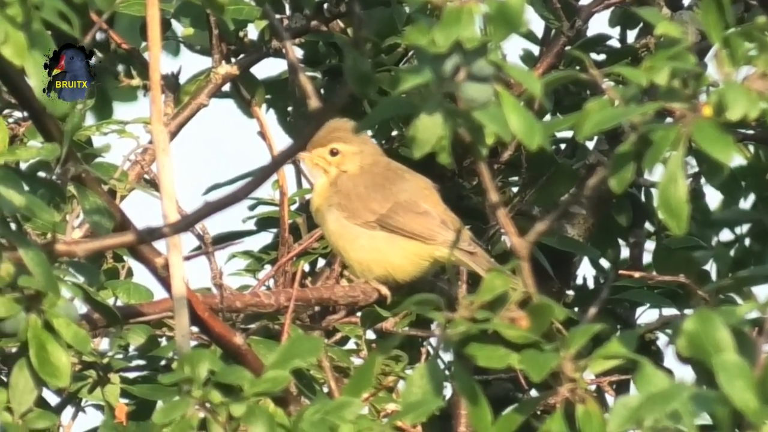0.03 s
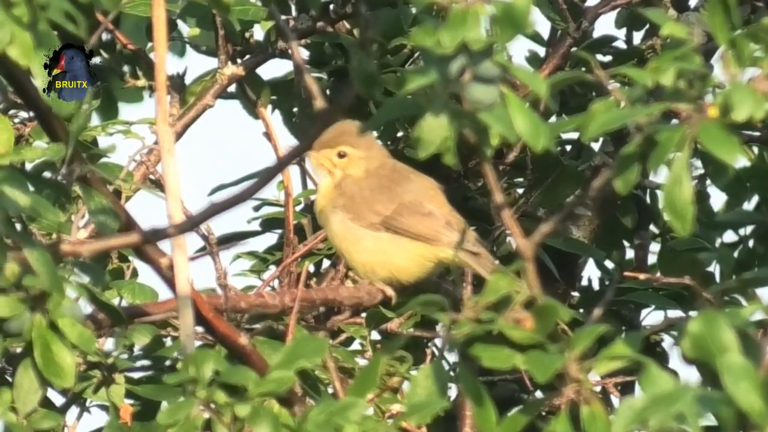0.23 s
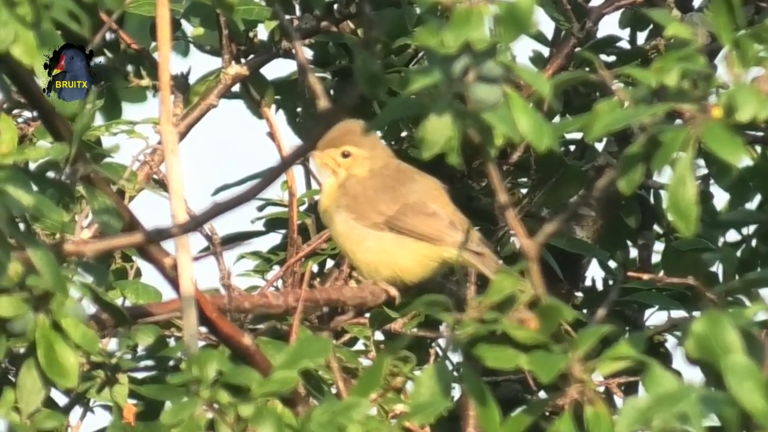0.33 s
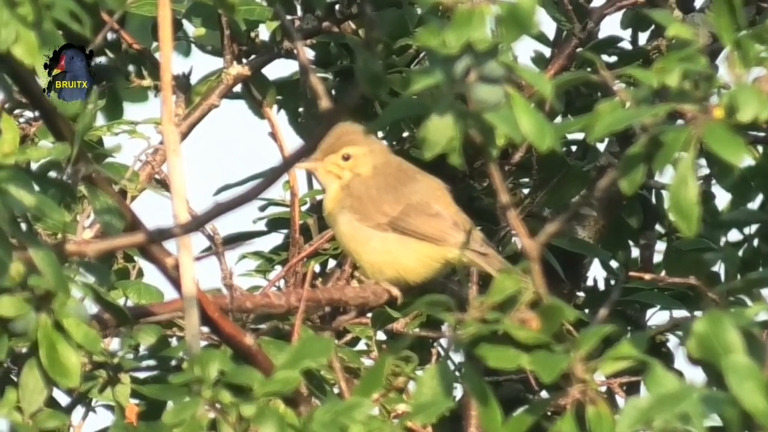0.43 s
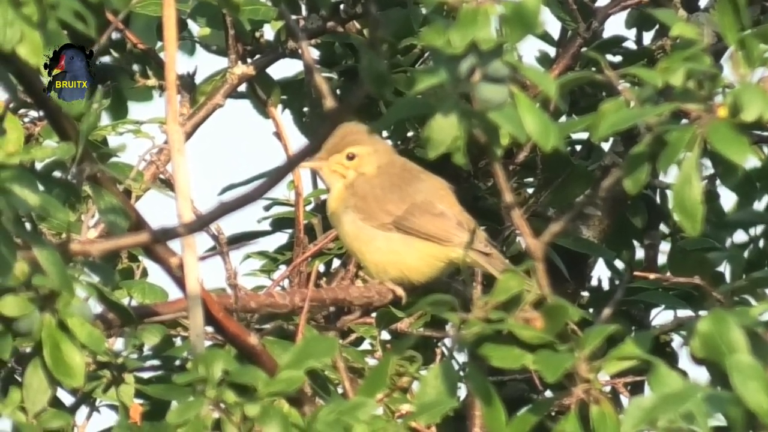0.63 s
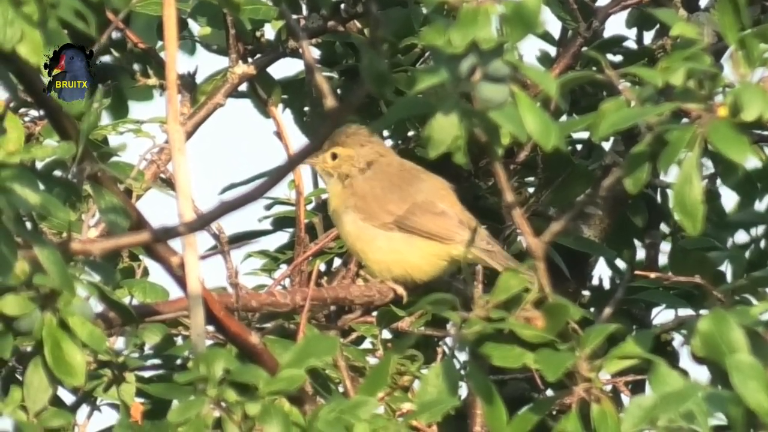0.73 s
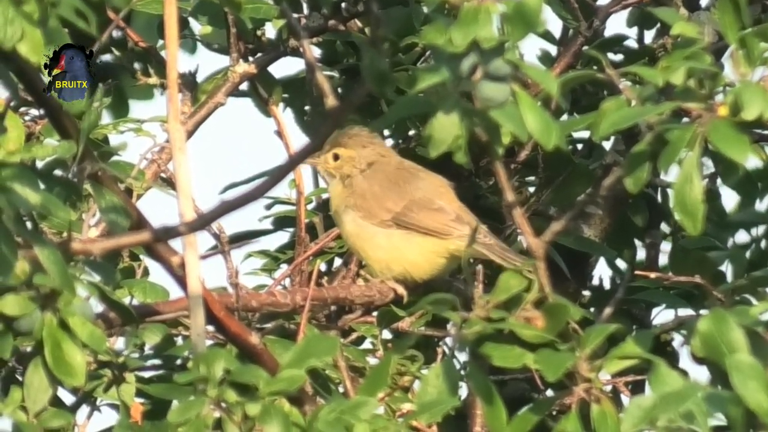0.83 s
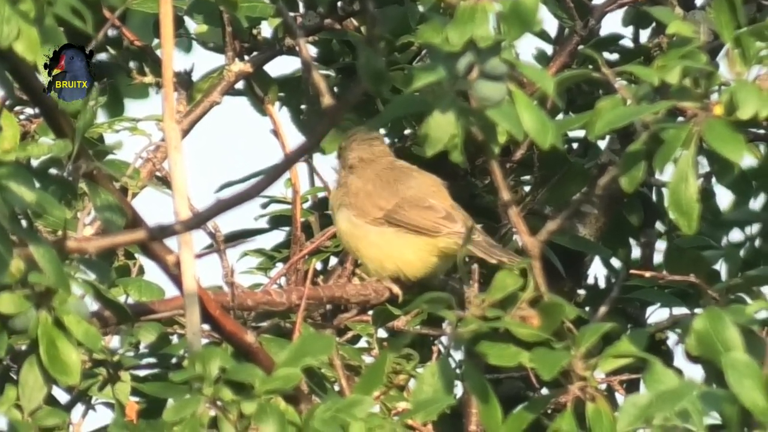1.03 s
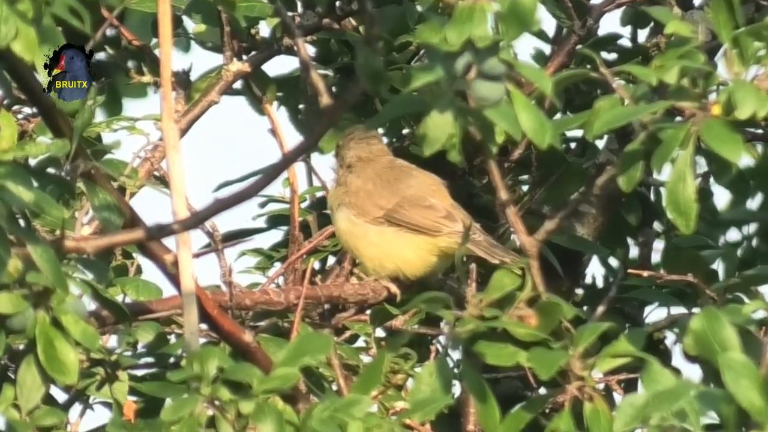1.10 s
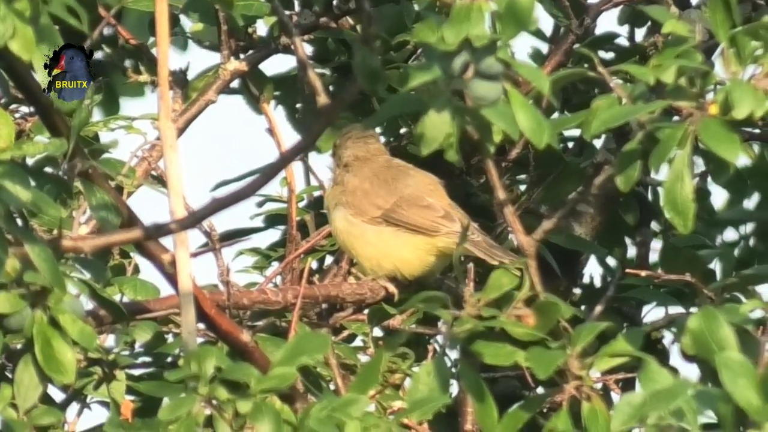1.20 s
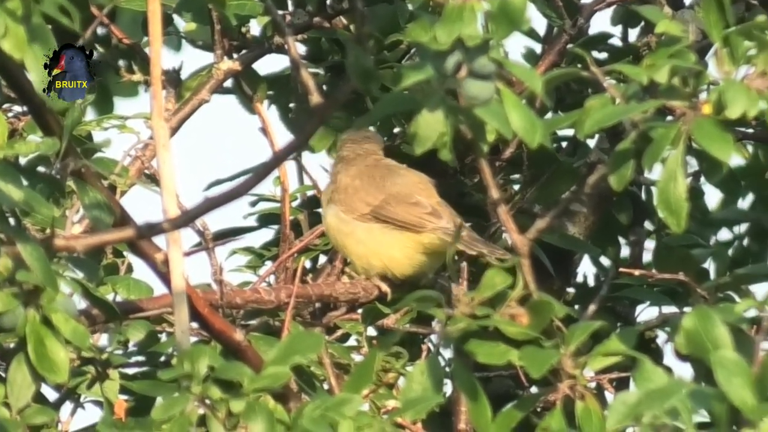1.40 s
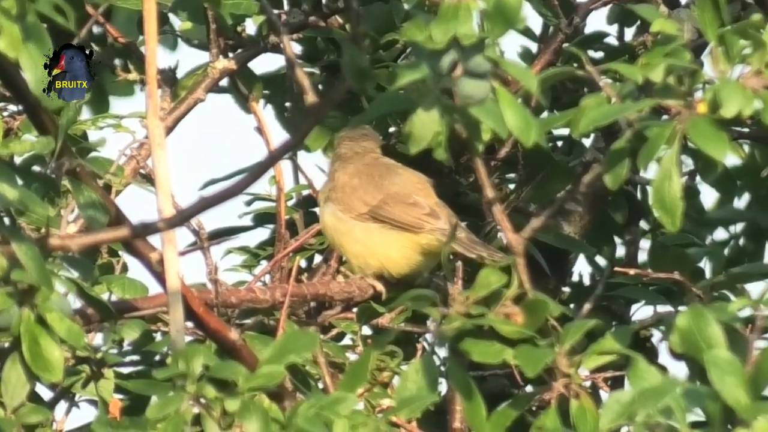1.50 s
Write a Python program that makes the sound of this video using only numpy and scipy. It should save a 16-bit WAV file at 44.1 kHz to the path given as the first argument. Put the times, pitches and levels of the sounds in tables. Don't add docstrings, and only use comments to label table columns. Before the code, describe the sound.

A small warbler gives a dry, buzzy chattering rattle from a bush, faint birds whistling behind

```python
import sys
import numpy as np
from scipy import signal
from scipy.fft import rfft, irfft
from scipy.io import wavfile

SR = 44100
rng = np.random.default_rng(int(sys.argv[2]) if len(sys.argv) > 2 else 0)


def nominal_scale(level):
    x = np.asarray(level, float) / 20
    return 10 ** x


def log_audio(samples):
    frames = np.atleast_2d(samples).T
    limited = np.clip(frames, -1, 1)
    pcm = np.round(limited * 32767).astype(np.int16)
    wavfile.write(sys.argv[1], SR, pcm)


N = 68355

# frequency in Hz, density in dB per Hz.
AIR_SPECTRUM = [(150, -14), (250, -15.5), (945, -4.5), (1290, -5), (1610, -8), (2090, -13.5), (2710, -8),
                (3060, -10.5), (15500, -25.5)]


def rms_one(x):
    return x / np.sqrt(np.mean(x ** 2) + 1e-20)


def drift(rate_hz):
    settle = 20000
    r = np.exp(-2 * np.pi * rate_hz / SR)
    slow = signal.lfilter([1], [1, -2 * r, r * r], rng.standard_normal(N + settle))
    return rms_one(slow[settle:])


def coloured(points):
    hz, level = np.transpose(points)
    f = np.maximum(np.arange(N // 2 + 1) * SR / N, 1)
    shape = np.interp(np.log(f), np.log(hz), level, left=-80, right=-80)
    return rms_one(irfft(rfft(rng.standard_normal(N)) * nominal_scale(shape), N))


def band(low_hz, high_hz):
    sos = signal.butter(2, [low_hz, high_hz], "band", fs=SR, output="sos")
    return rms_one(signal.sosfilt(sos, rng.standard_normal(N)))


def air():
    return nominal_scale(-45 + 0.76 * drift(9.1)) * coloured(AIR_SPECTRUM)


def drones():
    # centre in Hz, width in Hz, level at first in dB, level at last in dB.
    hums = [
        (428.5, 93, -53.5, -53.5),
        (1658, 160, -64, -48.5),
        (3420, 900, -53.5, -61),
    ]
    total = np.zeros(N)
    for hz, width, first_db, last_db in hums:
        level_db = np.linspace(first_db, last_db, N) + 1.9 * drift(16)
        total += nominal_scale(level_db) * band(hz - width / 2, hz + width / 2)
    return total


def rumble():
    # frequency in Hz, density in dB per Hz.
    rumble_spectrum = [(8.8, -32), (15, 4.5), (25, -1.5), (70, -10.5), (140, -15.5), (300, -12.5),
                       (390, -55), (660, -120)]
    return nominal_scale(-56) * coloured(rumble_spectrum)


def traffic():
    # time in seconds, level in dB.
    approach = [
        (0.0, -51),
        (0.056, -74),
        (0.966, -70.5),
        (1.026, -58.5),
        (1.55, -46.5),
    ]
    edges_hz = [111, 292]
    s, db = np.transpose(approach)
    level_db = np.interp(np.arange(N) / SR, s, db) - 0.5
    return nominal_scale(level_db + 4.5 * drift(29)) * band(*edges_hz)


def hiss():
    # frequency in Hz, density in dB per Hz.
    hiss_spectrum = [(1760, -21), (3000, -13.5), (5770, -9), (7910, -8.5), (12000, -9.5), (15500, -18)]
    return nominal_scale(-59) * coloured(hiss_spectrum) + nominal_scale(-76.5) * coloured(AIR_SPECTRUM)


def foliage(x):
    t60_s, level_db, first_echo_s = .15, -19, .004
    t = np.arange(int(.25 * SR)) / SR
    spray = rng.standard_normal(len(t)) * nominal_scale(-60 * t / t60_s) * (t > first_echo_s)
    return nominal_scale(level_db) * signal.fftconvolve(x, spray / np.sqrt(np.sum(spray ** 2)))[:N]


def whistles():
    # start in seconds, length in seconds, first pitch in Hz, last pitch in Hz, level in dB.
    calls = [(0, .028, 2950, 3250, -50), (.03, .02, 2450, 2800, -52), (.064, .02, 3050, 1950, -49),
             (.094, .012, 3950, 4150, -56), (.096, .014, 3100, 3300, -57), (.122, .015, 4100, 3300, -51),
             (.143, .021, 2950, 1900, -48), (.175, .012, 3350, 3100, -53), (.272, .016, 2950, 3150, -48),
             (.326, .022, 2900, 2050, -47), (.332, .012, 3200, 3150, -49), (.19, .02, 3100, 2950, -57),
             (.524, .010, 2850, 2850, -49), (.61, .025, 2750, 3050, -54), (.692, .048, 3100, 3800, -54),
             (.794, .02, 3000, 3500, -52), (.888, .024, 2900, 3600, -51), (.985, .025, 2850, 3050, -55),
             (1.068, .02, 3900, 3700, -55), (1.17, .016, 3400, 2600, -56), (1.325, .02, 2900, 3500, -55),
             (1.395, .022, 2500, 2200, -54)]
    # start in seconds, peak in seconds, peak pitch in Hz, curvature in Hz per ms^2, level in dB.
    arch_call = (1.492, 1.528, 3120, .45, -43)
    out, waver = np.zeros(N + SR), drift(95)
    for start, length, from_hz, to_hz, db in calls:
        u = np.linspace(0, 1, int(length * SR))
        i = int(start * SR)
        hz = from_hz + (to_hz - from_hz) * u
        swell = np.sin(np.pi * u) ** .6
        out[i:i + len(u)] += nominal_scale(db + 6) * swell * np.sin(2 * np.pi * np.cumsum(hz) / SR)
    start, peak, peak_hz, curvature, db = arch_call
    t = np.arange(N) / SR
    hz = np.maximum(peak_hz - curvature * (1000 * (t - peak)) ** 2, 2000)
    onset = np.clip((t - start) / .02, 0, 1)
    arch = nominal_scale(db) * onset * np.sin(2 * np.pi * np.cumsum(hz) / SR)
    out = (out[:N] + arch) * nominal_scale(1.8 * waver)
    return out + nominal_scale(8) * foliage(out)


def insect():
    # start in seconds, length in seconds, level in dB.
    bursts = [
        (.06, .18, -71),
        (.54, .18, -71),
        (1.49, .07, -71),
    ]
    tone_hz, ramp_s = 11579, .01
    t = np.arange(N) / SR
    on = np.zeros(N)
    for start, length, db in bursts:
        to_edge = np.minimum(t - start, start + length - t)
        on += nominal_scale(db) * np.clip(to_edge / ramp_s, 0, 1)
    tones = np.sin(2 * np.pi * tone_hz * t) + np.sin(np.pi * tone_hz * t)
    return on * nominal_scale(2.0 * drift(40)) * tones


def membrane_hz(peak_hz, start_hz, before, fall_hz, wobble):
    jitter = .006
    return peak_hz * (1 + jitter * wobble) - (peak_hz - start_hz) * before - fall_hz


def vocal_tract_db(hz, u):
    throat_hz = 4100 + (3300 - 4100) * u
    throat = 8 * (1 - u / 2) / (1 + ((hz - throat_hz) / 500) ** 2)
    windpipe = 5 / (1 + ((hz - 3100) / 150) ** 2)
    return throat + windpipe


def beak(x):
    x = x + 1e-18
    dull = signal.sosfilt(signal.butter(4, 7400, fs=SR, output="sos"), x)
    leak = signal.sosfilt(signal.butter(4, 10000, "high", fs=SR, output="sos"), x)
    return dull + nominal_scale(-13.5) * leak


def warbler():
    # start in seconds, length in seconds, level in dB.
    notes_sung = [(0.229, .036, -25), (0.286, .040, -23.5), (0.343, 0.044, -22.5), (.409, 0.042, -23),
                  (0.479, 0.042, -22), (0.549, 0.045, -21.5), (.636, 0.044, -22), (0.739, 0.05, -22.5),
                  (0.814, 0.051, -22.5), (0.913, 0.048, -23), (1.011, 0.051, -23), (1.111, 0.048, -24),
                  (1.21, 0.048, -23.5), (1.343, 0.047, -24.5)]
    # time in seconds, high voice in Hz, low voice in Hz.
    arch_tops = [(.2435, 1360, 1062), (.3075, 1435, 1135), (.3715, 1512, 1175), (.4345, 1462, 1148),
                 (.5015, 1518, 1150), (.5745, 1535, 1188), (.662, 1525, 1148), (.769, 1460, 1135),
                 (.8415, 1566, 1204), (.9415, 1490, 1170), (1.0425, 1534, 1172), (1.138, 1450, 1160),
                 (1.2385, 1465, 1135), (1.370, 1384, 1090)]
    multiples = [(1, 0), (0, 1), (2, 0), (1, 1), (0, 2), (3, 0), (2, 1), (1, 2), (0, 3), (4, 0), (3, 1),
                 (2, 2), (1, 3), (5, 0), (0, 4), (4, 1), (3, 2), (2, 3), (-1, 3), (4, -1), (3, -1), (1, 4),
                 (-1, 4), (5, 1)]
    tones_db = [-4.5, 0, 1.5, -7, 6, 0, 3, 4, 5, 1, -1, 2, -1, 0, 3, -2, -4, -8, -9, -5, -15, -13, -3, -12]
    # frequency in Hz, level in dB.
    rasp_spectrum = [(1500, -24), (2900, -12), (3900, 0), (5800, -4), (7300, -13), (9000, -25),
                     (12000, -33), (15500, -38)]
    fall_hz_per_ms2, low_fall_share = 1.6, .65
    shimmer_db_per_khz, phase_spread = .5, 1.2
    attack_s, release_s, edge_db = 0.0083, 0.014, -16
    rasp_db, saturation = -10, 3.0
    out = np.zeros(N)
    low_wobble, high_wobble = drift(150), drift(150)
    rasp = coloured(rasp_spectrum)
    shimmer = [drift(100) for _ in multiples]
    for (start, length, db), (top_s, high_hz, low_hz) in zip(notes_sung, arch_tops):
        i = np.arange(int(start * SR), int((start + length) * SR))
        t = i / SR - start
        u = t / length
        before = np.clip(1 - t / (top_s - start), 0, 1) ** 1.5
        after_ms = np.maximum(1000 * (i / SR - top_s), 0)
        fall = np.minimum(fall_hz_per_ms2 * after_ms ** 2, 380)
        low = membrane_hz(low_hz, 1045, before, low_fall_share * fall, low_wobble[i])
        high = membrane_hz(high_hz, 1300, before, fall, high_wobble[i])
        note = np.zeros(len(i))
        for (m, n), tone_db, shake in zip(multiples, tones_db, shimmer):
            hz = m * low + n * high
            lift_db = vocal_tract_db(hz, u) + shimmer_db_per_khz * hz / 1000 * shake[i]
            phase = 2 * np.pi * np.cumsum(hz) / SR + phase_spread * shake[i[0]]
            note += nominal_scale(tone_db + lift_db) * np.cos(phase)
        gate = 1 + np.cos(2 * np.pi * np.cumsum(low) / SR)
        voice = rms_one(note) + nominal_scale(rasp_db) * gate * rasp[i]
        attack = np.clip(1 - t / attack_s, 0, 1) ** 0.81
        release = np.clip(1 - (length - t) / release_s, 0, 1) ** 2.17
        level = nominal_scale(db + edge_db * (attack + release))
        out[i] += level * saturation * np.tanh(voice / saturation)
    return beak(out)


def scene():
    chirr, bird = insect(), warbler()
    ambience = air() + drones() + rumble() + traffic()
    mid = ambience + whistles() + chirr + bird + foliage(bird)
    treble = signal.sosfilt(signal.butter(4, 7000, "high", fs=SR, output="sos"), mid)
    side = hiss() + 1.1 * chirr + (nominal_scale(-0.25) - 1) * treble
    return np.array([mid + side, mid - side])


def band_limit(x):
    return signal.sosfilt(signal.butter(12, 15670, fs=SR, output="sos"), x)


def record(dry):
    cut = signal.sosfilt(signal.cheby2(12, 70, 16450, fs=SR, output="sos"), dry)
    return band_limit(cut)


dry = scene()
out = record(dry)
log_audio(out)
```